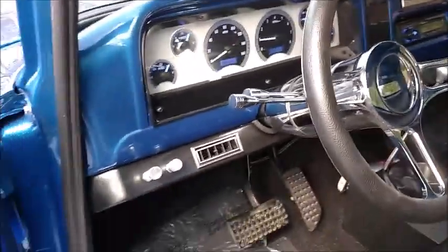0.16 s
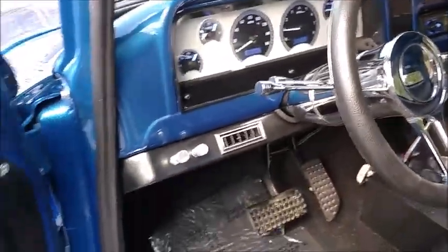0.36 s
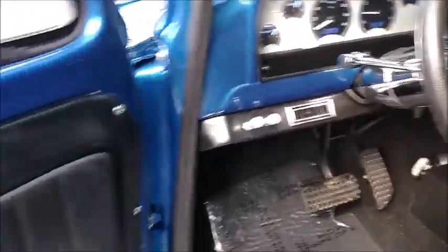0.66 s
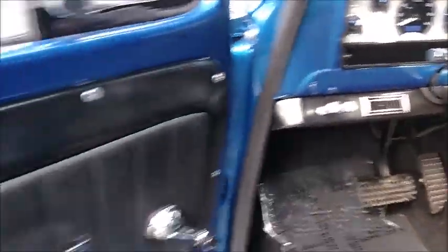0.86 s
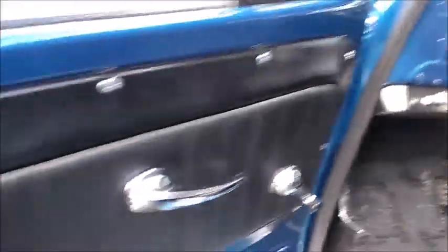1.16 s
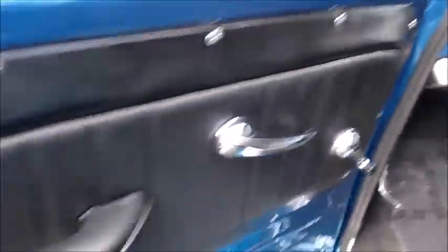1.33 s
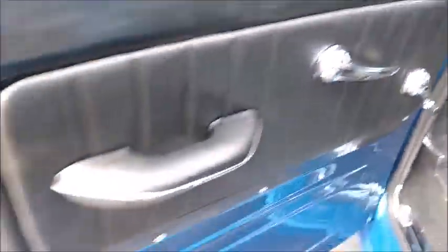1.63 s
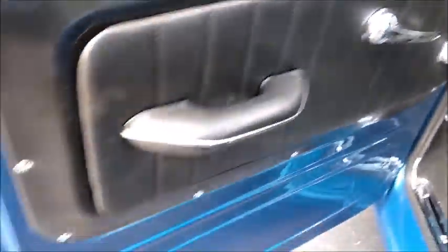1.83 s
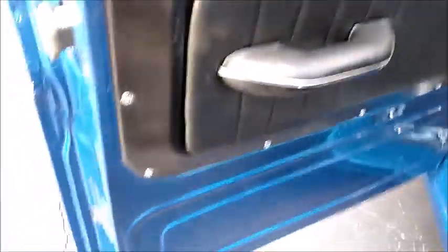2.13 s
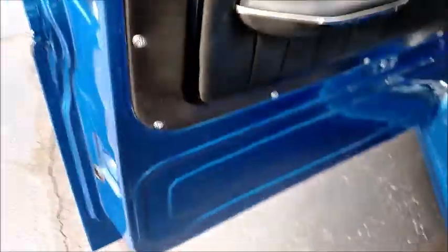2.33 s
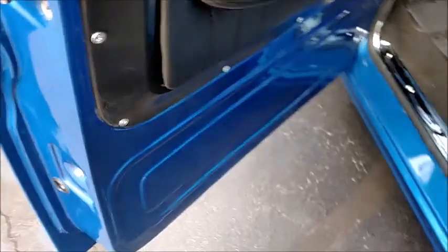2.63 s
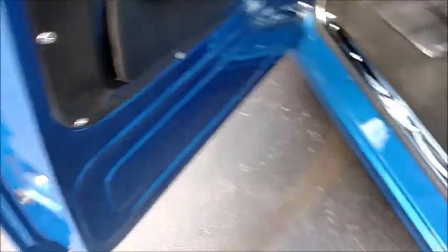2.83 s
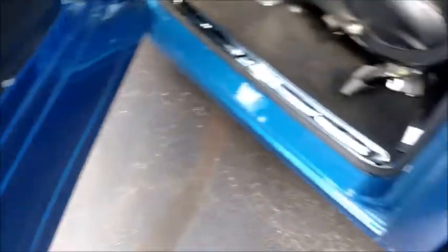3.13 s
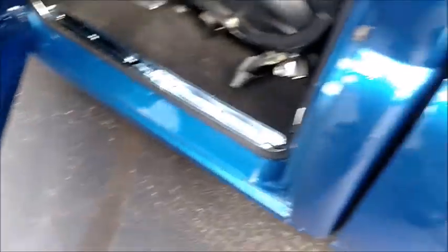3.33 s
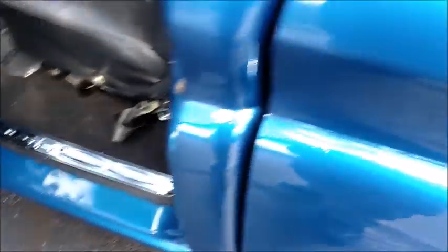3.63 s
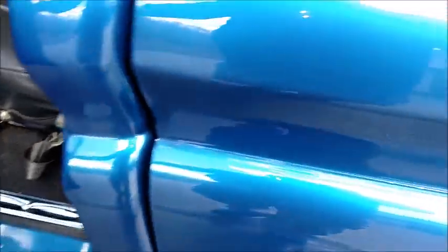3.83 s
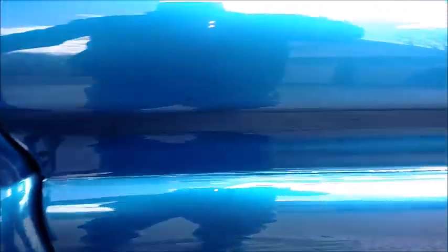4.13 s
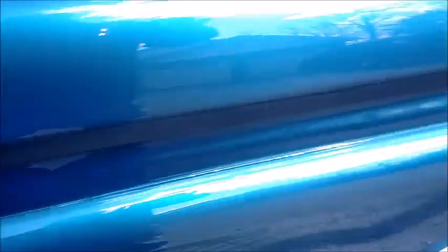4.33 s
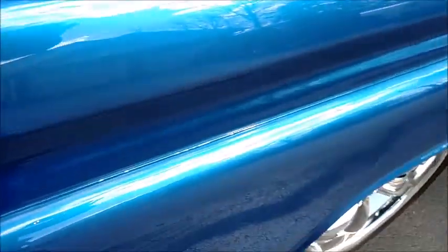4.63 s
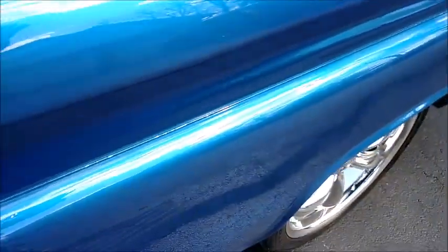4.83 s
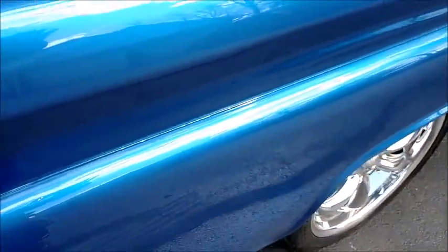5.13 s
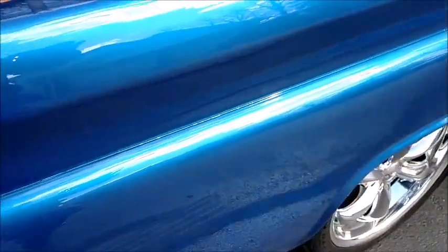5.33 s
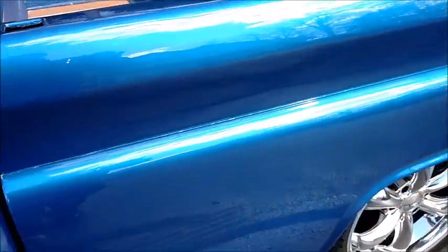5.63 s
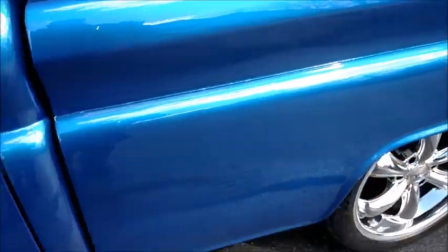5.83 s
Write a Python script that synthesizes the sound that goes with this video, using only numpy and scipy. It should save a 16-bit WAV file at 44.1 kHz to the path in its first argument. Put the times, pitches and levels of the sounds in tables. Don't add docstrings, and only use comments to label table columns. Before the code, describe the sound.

Steady rumbling idle of a large car engine outdoors, light tappet ticking and faint whine, then one sharp metallic latch clack and bumps of wind.

```python
import sys
import numpy as np
from scipy import signal
from scipy.fft import rfft, irfft
from scipy.io import wavfile

SR = 44100
rng = np.random.default_rng(int(sys.argv[2]) if len(sys.argv) > 2 else 0)


def digitize_waveform(pressure):
    field = np.atleast_2d(pressure).T
    bounded = np.clip(field, -1, 1)
    quanta = np.round(bounded * 32767).astype(np.int16)
    wavfile.write(sys.argv[1], SR, quanta)


def boost_factor(decibels):
    exponent = np.asarray(decibels, float) / 20
    return 10 ** exponent


N = 263718
TIME = np.arange(N) / SR


def rms_one(x):
    return x / np.sqrt(np.mean(x ** 2) + 1e-20)


def in_time(rows):
    s, *columns = np.transpose(rows)
    return [np.interp(TIME, s, column) for column in columns]


def near(s, span_s):
    return np.exp(-.5 * ((TIME - s) / span_s) ** 2)


def dying(s, length_s):
    return (TIME >= s) * np.exp(-np.maximum(TIME - s, 0) / length_s)


def resonance(x, hz, width_hz):
    r = np.exp(-np.pi * width_hz / SR)
    top = [(1 - r * r) / 2, 0, (r * r - 1) / 2]
    return signal.lfilter(top, [1, -2 * r * np.cos(2 * np.pi * hz / SR), r * r], x + 1e-18)


def butter(x, order, hz, kind="low"):
    return signal.sosfilt(signal.butter(order, hz, kind, fs=SR, output="sos"), x)


def coloured(spectrum):
    hz, level_db = np.transpose(spectrum)
    grid = np.maximum(np.fft.rfftfreq(N, 1 / SR), 1)
    gain = boost_factor(np.interp(np.log(grid), np.log(hz), level_db))
    return rms_one(irfft(rfft(rng.standard_normal(N)) * gain, N))


def drift(rate_hz):
    knots = np.arange(0, TIME[-1] + 1, .5 / rate_hz)
    return np.interp(TIME, knots, rng.standard_normal(len(knots)))


# t/s, way from inside the cab to the body side [0-1], view of the ground under the sill [0-1]
WALK = [
    (0, 0.3, 0),
    (.9, 0.36, 0.1),
    (1.5, 0.61, 0.62),
    (2.0, 0.68, 0.82),
    (2.7, 0.79, 0.95),
    (3.5, 1, .6),
    (4.4, 0.92, 0.18),
    (5.2, 0.81, 0),
    (5.98, 0.89, 0.4),
]


def heard(law):
    cab_db, outside_db, half, width, ground_db = law
    way, ground = in_time(WALK)
    outside = 1 / (1 + np.exp((half - way) / max(width, .01)))
    return cab_db + (outside_db - cab_db) * outside + ground_db * ground


# t/s, firings per second [f/Hz]
IDLE_SPEED = [(0.0, 62.502), (0.46, 63.273), (0.92, 62.29), (1.38, 62.978), (1.84, 62.293), (2.3, 62.605),
              (2.76, 62.053), (3.22, 63.259), (3.68, 62.336), (4.14, 62.086), (4.6, 62.18), (5.06, 62.486),
              (5.52, 62.192), (5.98, 62.685)]


def engine_cycle():
    return .004 + np.cumsum(in_time(IDLE_SPEED)[0]) / SR / 8


def strikes(cycle, places, levels_db, jitter_ms, spread_db):
    out, turns = np.zeros(N), np.arange(int(cycle[-1]) + 1)
    for place, level_db in zip(places, levels_db):
        late, strong = rng.standard_normal((2, len(turns)))
        at = np.interp(turns + place % 1, cycle, np.arange(N), left=-N, right=2 * N)
        at = at + late * jitter_ms * SR / 1000
        inside = (at >= 0) & (at < N - 1)
        np.add.at(out, at[inside].astype(int), boost_factor(level_db + spread_db * strong)[inside])
    return out


def firings(cycle, cylinders, jitter_ms, spread_db):
    strength_db, lag_ms = np.transpose(cylinders)
    places = np.arange(8) / 8 + lag_ms * 62.5 / 8000
    clicks = strikes(cycle, places, strength_db, jitter_ms, spread_db)
    return np.convolve(clicks, signal.windows.hann(round(.0025 * SR)), "same")


def path(cycle, cylinders, modes, band_hz=None):
    puffs = firings(cycle, cylinders, jitter_ms=.1, spread_db=.8)
    rung = sum(sign * boost_factor(db) * resonance(puffs, hz, width) for hz, width, db, sign in modes)
    if band_hz:
        rung = signal.sosfiltfilt(signal.butter(4, band_hz, "band", fs=SR, output="sos"), rung)
    return rms_one(rung)


# f/Hz, width [Hz], level/dB
PANELS = [(190, 57, -4.5), (217.3, 16, -7), (284, 25, -2), (352, 36, -1.5), (426.3, 38, -1.5),
          (556, 14, -26)]


def loose_panels(cycle, cylinders):
    rough = firings(cycle, cylinders, jitter_ms=.4, spread_db=2.5)
    shaken = 0
    for k, (hz, width, db) in enumerate(PANELS):
        ring = resonance(resonance(rough, hz, width), hz, 3 * width)
        shaken = shaken + (-1) ** k * boost_factor(db) * ring
    return rms_one(shaken)


# level/dB, lag [ms]
CAB_CYLINDERS = [(0.0, -7.03), (-16.9, 2.74), (-5.8, -2.33), (-6.5, 0.61), (-8.6, -2.35), (-4.4, 3.71),
                 (-11.9, -4.74), (-4.5, -1.2)]
DOORWAY_CYLINDERS = [(-2.2, -0.07), (-0.9, 6.43), (0.0, 4.55), (-3.7, 2.52), (-1.8, 9.0), (-4.6, 3.2),
                     (-7.8, -2.51), (-12.4, -3.25)]
SIDE_CYLINDERS = [(-0.9, 0.79), (0.0, -3.45), (-3.8, -4.53), (-19.0, 3.09), (-16.7, -2.35), (-6.8, -5.98),
                  (-8.4, 1.75), (-23.9, -1.82)]
# f/Hz, width [Hz], level/dB, polarity
CAB = [(220.4, 16.0, 0.0, 1), (283.9, 16.0, -18.1, 1), (337.0, 17.0, 13.3, 1), (345.0, 18.4, 12.5, -1),
       (429.0, 16.0, -13.5, -1)]
DOORWAY = [(232.7, 16.0, 0.0, 1), (260.0, 58.7, -15.5, -1), (310.0, 16.0, -48.0, 1),
           (345.0, 23.4, -26.9, -1), (410.0, 60.0, -29.5, 1)]
SIDE = [(219.6, 16.0, 0.0, 1), (273.4, 16.0, -10.7, 1), (315.4, 16.0, -6.0, -1), (362.9, 16.0, -6.1, -1),
        (421.5, 16.0, -21.9, -1)]
BODY_BAND_HZ = [180, 480]
# level/dB in the cab, level/dB outside, way at half change, width of change, ground [dB]
CAB_HEARD = (-6.5, -35, 0.64, .04, 0)
CAB_TOP_HEARD = (3.5, -14, 0.36, 0.04, 0)
SIDE_HEARD = (-35, -7, .76, .04, 0)


def bodywork(cycle):
    cab = path(cycle, CAB_CYLINDERS, CAB, BODY_BAND_HZ)
    cab = cab + (boost_factor(heard(CAB_TOP_HEARD)) - 1) * resonance(cab, 348, 90)
    by_door = boost_factor(-10.5) * np.exp(-.5 * ((in_time(WALK)[0] - .7) / .09) ** 2)
    doorway = by_door * path(cycle, DOORWAY_CYLINDERS, DOORWAY, BODY_BAND_HZ)
    side = boost_factor(heard(SIDE_HEARD)) * path(cycle, SIDE_CYLINDERS, SIDE, BODY_BAND_HZ)
    return boost_factor(heard(CAB_HEARD)) * cab + doorway + side


# level/dB, lag of the exhaust runner [ms]
CYLINDERS = [(-10.3, 5.74), (1.1, -0.25), (-3.0, 0.43), (-0.4, -0.62), (-7.8, -4.63), (-5.3, -4.19),
             (-4.9, -0.39), (1.6, -3.65)]
# f/Hz, width [Hz], level/dB, polarity
PIPES = [(44.3, 7.0, -19.4, -1), (100.5, 7.0, -8.1, 1), (136.8, 7.0, 0.0, -1), (168.3, 7.0, -14.3, -1),
         (217.3, 16.0, -22, -1)]
# level/dB in the cab, level/dB outside, way at half change, width of change, ground [dB]
PIPES_HEARD = (-6.5, -0.3, 0.14, 0.24, 3.5)
PANELS_HEARD = (-30, 0, 1, 0.17, 2.1)


def exhaust(cycle):
    tone = boost_factor(.9 * drift(4)) * np.sqrt(2) * np.cos(2 * np.pi * 8 * cycle)
    pipes = boost_factor(heard(PIPES_HEARD)) * path(cycle, CYLINDERS, PIPES)
    panels = boost_factor(heard(PANELS_HEARD) - 12) * loose_panels(cycle, CYLINDERS)
    return tone + pipes + panels + bodywork(cycle)


# place in the cycle [0-1], level/dB
VALVES = [(.29, -2), (.92, -8), (.59, -10), (.64, -11), (.16, -12), (.41, -13), (.79, -10)]
# f/Hz, width [Hz], level/dB
COVER = [(2440, 410, 0.5), (2910, 604, 6.5), (3452, 400, 0), (3870, 320, -3), (4310, 420, -9),
         (6320, 870, -4), (6950, 870, -11.5), (7800, 860, -20.5), (11000, 3000, -27)]


def valves(cycle):
    ticks = strikes(cycle, *np.transpose(VALVES), jitter_ms=1.2, spread_db=2.0)
    age = np.linspace(-1.5, 1.5, round(.03 * SR))
    shape = np.exp(-(age / np.where(age < 0, .2, .55)) ** 2)
    contact = np.convolve(ticks, shape, "same") + .26 * boost_factor(2 * drift(8))
    burst = contact * rng.standard_normal(N)
    ringing = 0
    for hz, width, db in COVER:
        ring = resonance(resonance(burst, hz, width), hz, 2 * width) / np.sqrt(width)
        ringing = ringing + boost_factor(db + 1.5 * drift(3)) * ring
    return rms_one(ringing)


# t/s, peak level/dB, ring f/Hz
TAPPETS = [(0.0353, -54.5, 4580), (0.1625, -55, 5000), (0.2438, -56, 4680), (0.2904, -55, 4650),
           (0.392, -62.5, 4720), (0.5436, -54, 5700), (0.6694, -51.5, 4500), (0.8014, -55.5, 4550),
           (0.927, -55, 5320), (1.055, -53, 5410), (1.1832, -50.5, 6740), (1.2456, -57, 6050),
           (1.309, -51, 4540), (1.391, -58, 4500), (1.4353, -52.5, 4650), (1.5162, -56, 4700),
           (1.5626, -48.5, 4700), (1.6003, -56, 6010), (1.6905, -51, 4500), (1.8201, -49, 4830),
           (1.9487, -53, 4820), (2.033, -61, 4600), (2.0768, -47.5, 4740), (2.143, -55, 4500),
           (2.2052, -51.5, 4530), (2.3311, -51, 4590), (2.378, -54, 5300), (2.4583, -54, 4790),
           (2.589, -48, 4540), (2.6865, -54.5, 5910), (2.7195, -49, 4760), (2.803, -56.5, 4500),
           (2.8459, -52, 4860), (2.9763, -47, 7100), (3.0557, -50.5, 4680), (3.1015, -50, 4840),
           (3.1634, -58, 6500), (3.229, -50, 6230), (3.3099, -57, 6750), (3.3545, -52.5, 5270),
           (3.4191, -57, 6940), (3.483, -50.5, 4570), (3.5466, -58, 4820), (3.6116, -47.5, 6460),
           (3.675, -58.5, 7280), (3.739, -50.5, 4500), (3.802, -56, 7250), (3.8676, -49, 4500),
           (3.93, -61, 4500), (3.9958, -50.5, 4640), (4.0595, -55.5, 4510), (4.1243, -50, 4740),
           (4.2056, -54.5, 4670), (4.254, -47.5, 4540), (4.3824, -48.5, 4500), (4.4445, -59, 5350),
           (4.5101, -51, 4580), (4.593, -61, 4860), (4.6389, -49, 5190), (4.721, -58.5, 4530),
           (4.895, -65.5, 4860), (4.9771, -70, 5200), (5.025, -65.5, 4590), (5.1522, -62.5, 4790),
                (5.233, -66, 4840), (5.2799, -60.5, 4670), (5.4101, -59, 4870), (5.475, -64.5, 4680),
                (5.538, -57, 5670), (5.666, -57, 4970), (5.7493, -62.5, 4810), (5.7948, -55.5, 6140),
                (5.8561, -56.5, 6160), (5.922, -57.5, 5000)]


def tappets():
    out, rows, since = np.zeros(N + 2048), TAPPETS, np.arange(2048) / SR
    rise_s, fall_s = .002, .0055
    shape = (1 - np.exp(-since / rise_s)) * np.exp(-since / fall_s)
    for s, db, hz in rows:
        noise = rng.standard_normal(2048)
        bright = rms_one(butter(noise, 3, [4000, 7800], "band"))
        ring = rms_one(resonance(noise, hz, 500))
        start = round(s * SR)
        out[start:start + 2048] += boost_factor(db - 11) * shape / shape.max() * (bright + boost_factor(-4) * ring)
    return out[:N]


# f/Hz, width [Hz], level/dB above the hiss
WHINES = [(554, 5.1, -10), (1000, 12, -6.5), (1288, 29, -14), (1505, 15, -13.5), (1672, 15, -18.5),
          (1860, 13, -15), (1862, 19, -14.5), (2070, 60, -14), (794, 17, -15.5), (1410, 15, -17),
          (1005, 20, -17.5), (1585, 30, -16.5)]
# t/s, heard for [s]
WHINE_SPOTS = [(1.4, .7), (5.65, .3), (1.8, 1.0), (.25, .2), (1.2, 1.0), (.6, .6), (3.2, .8), (3.1, .12),
               (.8, .5), (2.0, .5), (2.2, 1.2), (3.5, 1.2)]


def whines():
    white, out = rng.standard_normal(N), 0
    for (hz, width, db), (s, span_s) in zip(WHINES, WHINE_SPOTS):
        whine = rms_one(resonance(resonance(white, hz, width), hz, width))
        out = out + boost_factor(db) * near(s, span_s) * whine
    return out


def belt():
    hiss = rng.standard_normal(N)
    for _ in range(2):
        hiss = resonance(hiss, 7000, 1300)
    return boost_factor(-28 + 3.5 * drift(12)) * near(3.83, .59) * rms_one(hiss)


# t/s, heard for [s]
PUMP_SPOTS = [
    (1.8, .75),
    (4.3, .3),
    (5.1, .35),
]


def pump():
    spots = sum(near(s, span_s) for s, span_s in PUMP_SPOTS)
    hum = np.sin(2 * np.pi * np.cumsum(670 + drift(2.2)) / SR)
    return spots * boost_factor(-7 + 1.5 * drift(7.6)) * hum


# f/Hz, level/dB per Hz
BAY = [(260, -9), (450, -12.5), (600, -14.5), (800, -15), (1000, -15.5), (1400, -16.5), (1800, -20),
       (2200, -29), (2600, -35.5),
       (3500, -40), (6000, -48), (10000, -56), (15500, -63)]


def engine_bay():
    hiss = boost_factor(drift(20) + drift(3)) * coloured(BAY)
    return hiss + whines() + belt() + pump()


# f/Hz, level/dB per Hz
RUMBLE = [(12, -29.5), (25, 2), (32, -7), (45, -2.5), (80, 0), (100, -11), (140, -5.5), (230, -11),
          (450, -19), (700, -52.5), (1300, -93.5)]


def rumble():
    return boost_factor(-12) * coloured(RUMBLE)


# t/s, level/dB, rattle length [s]
LATCH = [
    (4.7506, -1.5, 0.003),
    (4.7536, -2, 0.0026),
    (4.7616, -8.5, 0.003),
    (4.7654, -13, 0.0024),
    (4.775, -22, 0.012),
    (4.786, -32, 0.0075),
]
# t/s, level/dB, length [s]
SETTLE = (4.811, -24.5, 0.026)
# f/Hz, level/dB, time to fall by 60 dB [s]
DOOR = [(200, 0, 0.05), (302, -10, 0.026), (375, -5.5, 0.059), (610, -2.5, 0.045), (637, -7.5, 0.05),
        (982, -9.5, 0.049), (1267, -13.5, 0.031), (1570, -9.5, 0.044), (1820, -16, 0.03)]
# f/Hz, level/dB per Hz
CRACK = [(180, -3), (300, -4), (626, -7.5), (1000, -13), (1600, -10), (2200, -19.5), (3120, -26.5),
         (6300, -30.5), (11000, -43)]


def latch():
    rattle = sum(boost_factor(db) * dying(s, length_s) for s, db, length_s in LATCH)
    settle_s, settle_db, settle_length_s = SETTLE
    settle = boost_factor(settle_db) * dying(settle_s, settle_length_s)
    push = (rattle + settle) * rng.standard_normal(N)
    rings = 0
    for hz, db, t60 in DOOR:
        r, w = boost_factor(-60 / (t60 * SR)), 2 * np.pi * hz / SR
        ring = signal.lfilter([0, np.sin(w)], [1, -2 * r * np.cos(w), r * r], push + 1e-18)
        rings = rings + boost_factor(db) * ring
    tail = signal.lfilter([.004], [1, -np.exp(-1 / (.011 * SR))], rattle)
    click = rms_one(resonance(resonance(rng.standard_normal(N), 2800, 1700), 2800, 3000))
    pawl = boost_factor(-40.5) * dying(4.8103, .0033) * click
    crack = coloured(CRACK)
    dull = butter(crack, 2, 2440)
    noise = rattle * crack + tail * (.27 * crack + dull) + settle * dull
    return butter(pawl + boost_factor(-30.5) * rings + boost_factor(-14) * noise, 4, 12000)


# f/Hz, width [Hz], level/dB
TRIM = [(850, 400, 0), (1200, 400, -3), (3600, 1200, -20), (5200, 800, -23)]


def trim():
    click = 1.0 * (np.arange(N) == round(2.3793 * SR))
    snap = 0
    for hz, width, db in TRIM:
        snap = snap + boost_factor(db) * resonance(resonance(click, hz, width), hz, 2 * width) / width
    return boost_factor(-25) * snap / np.abs(snap).max()


# t/s, peak level/dB, length [s], pitch f/Hz
KNOCKS = [(1.21, -15.5, 0.0088, 225), (4.208, -22.5, 0.013, 198), (4.319, -18, 0.0034, 330),
          (4.456, -33, 0.0097, 120), (5.319, -27, 0.0034, 261), (5.344, -19, 0.0046, 222),
          (5.53, -26, 0.022, 174), (5.738, -23.5, 0.0072, 200), (5.772, -22, 0.0059, 248),
          (5.8125, -12, 0.015, 126), (5.852, -13, 0.0075, 113), (5.871, -26, 0.015, 255),
          (5.892, -32, 0.0083, 261), (5.941, -24, 0.019, 111.4), (5.967, -20.5, 0.009, 230)]


def wind():
    out, since = np.zeros(N), (np.arange(4096) - 2048) / SR
    for s, db, length_s, hz in KNOCKS:
        start = round(s * SR) - 2048
        lump = rms_one(butter(rng.standard_normal(4096), 3, [200, 540], "band"))
        swing = np.cos(2 * np.pi * hz * since)
        snap_back = boost_factor(-14) * np.sin(2 * np.pi * 1.8 * hz * since)
        knock = (swing + snap_back + .13 * lump) * np.exp(-.5 * (since / (.5 * length_s)) ** 2)
        out[start:start + 4096] += boost_factor(db) * knock[:N - start]
    return out


def gain_control():
    duck_s, duck_db, attack_s, recover_db_per_s = 4.752, 15, .041, 9.5
    since = np.maximum(TIME - duck_s, 0)
    return np.minimum(recover_db_per_s * since - duck_db * (1 - np.exp(-since / attack_s)), 0)


# level/dB in the cab, level/dB outside, way at half change, width, ground [dB]
ENGINE_HEARD = (-24, -25.5, 0.63, 0.8, -0.28)
BAY_HEARD = (-23, -19.5, -0.37, 1, 2.04)
VALVES_HEARD = (-43.5, -35.5, 0.53, 0.15, 3)


def scene():
    cycle = engine_cycle()
    engine = exhaust(cycle) + rumble()
    engine = engine + boost_factor(heard(VALVES_HEARD)) * valves(cycle)
    engine = engine + boost_factor(heard(BAY_HEARD)) * engine_bay()
    engine = boost_factor(heard(ENGINE_HEARD) + gain_control()) * engine
    return (engine + tappets() + latch() + trim() + wind())[None]


def low_pass(x):
    return signal.sosfilt(signal.butter(12, 15500, fs=SR, output="sos"), x)


TREBLE_DIPS_S = [.382, .425, 1.043, 2.025, 2.771, 3.283, 3.348, 3.434, 4.606, 4.97, 5.354, 5.608]


def record(dry):
    noisy = dry + boost_factor(-81) * rng.standard_normal(dry.shape)
    treble = signal.sosfiltfilt(signal.butter(4, 4200, "high", fs=SR, output="sos"), noisy)
    lost = sum(np.exp(-((TIME - s) / .0065) ** 4) for s in TREBLE_DIPS_S)
    mix = .57 * np.tanh((noisy - treble * lost) / .56)
    return low_pass(mix)


dry = scene()
out = record(dry)
digitize_waveform(out)
```